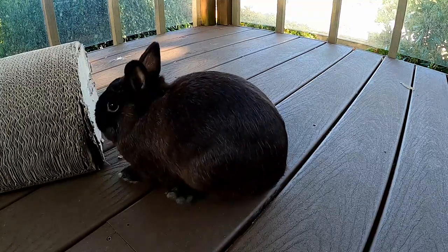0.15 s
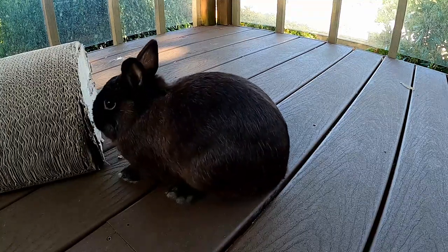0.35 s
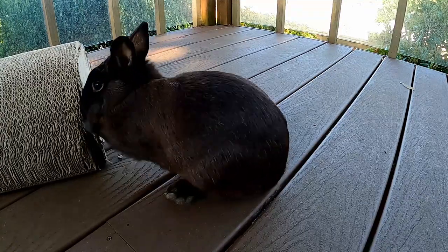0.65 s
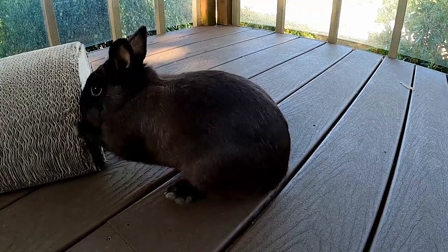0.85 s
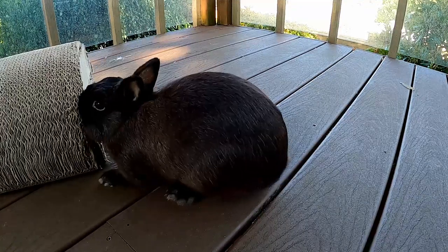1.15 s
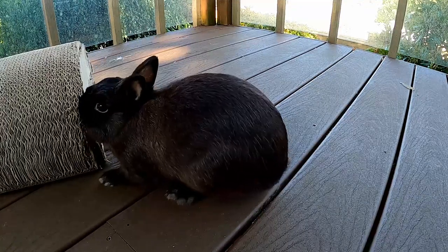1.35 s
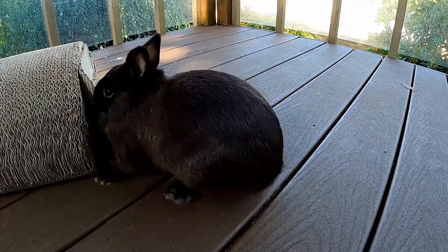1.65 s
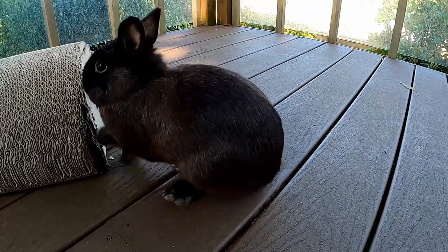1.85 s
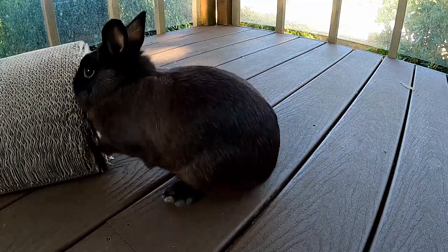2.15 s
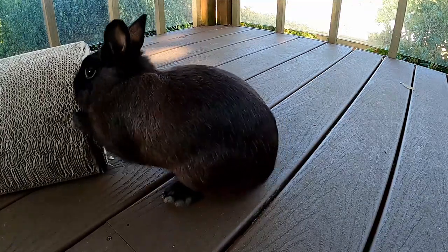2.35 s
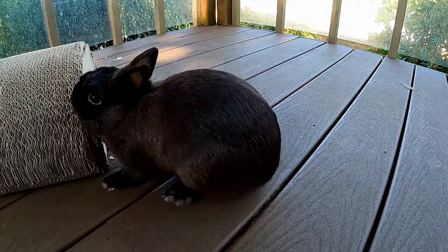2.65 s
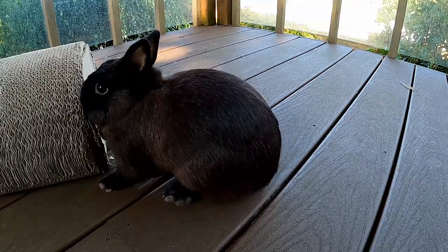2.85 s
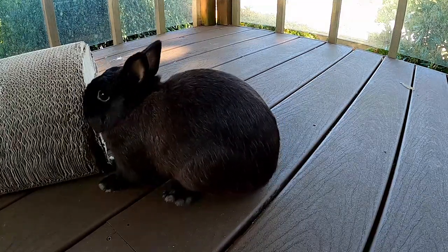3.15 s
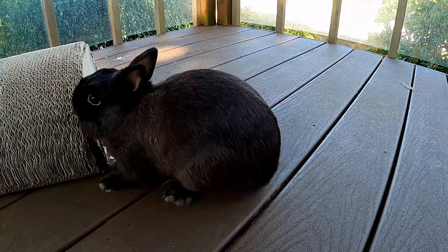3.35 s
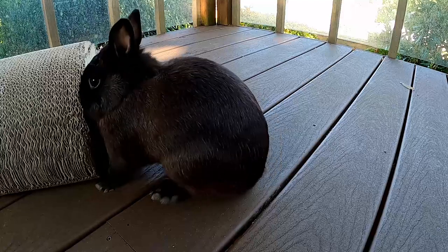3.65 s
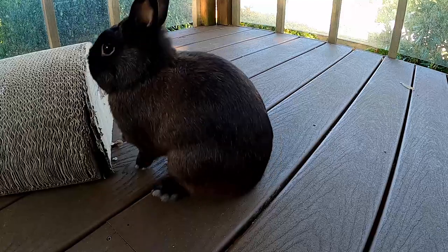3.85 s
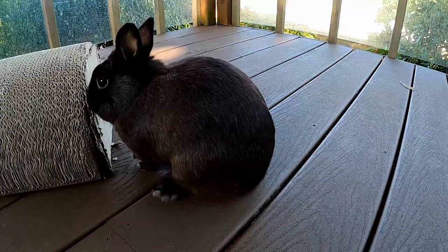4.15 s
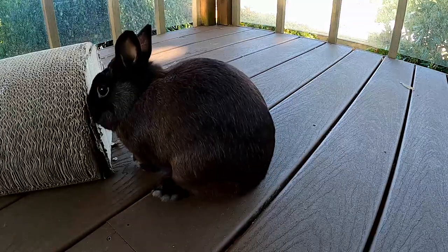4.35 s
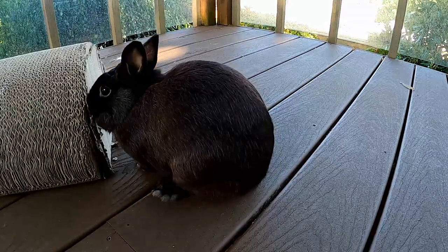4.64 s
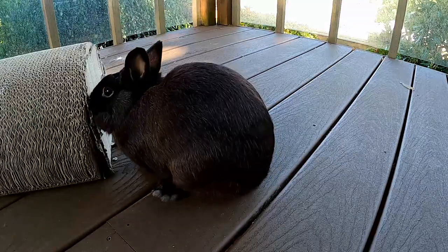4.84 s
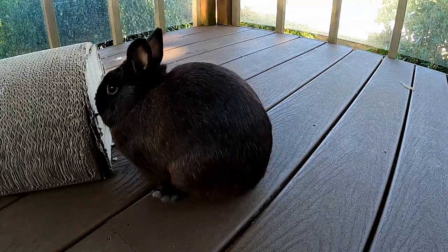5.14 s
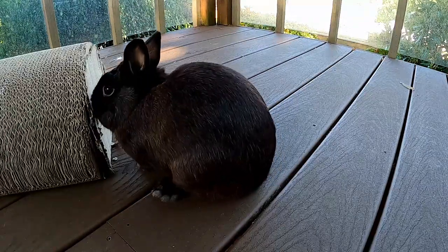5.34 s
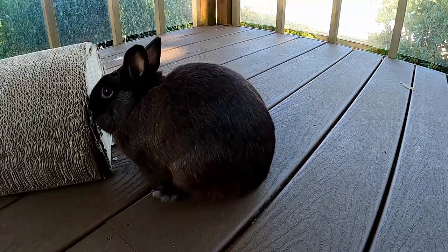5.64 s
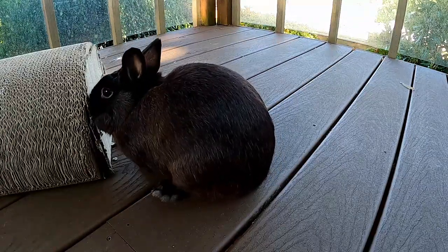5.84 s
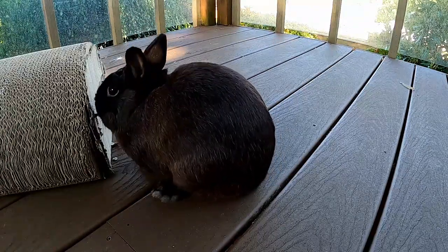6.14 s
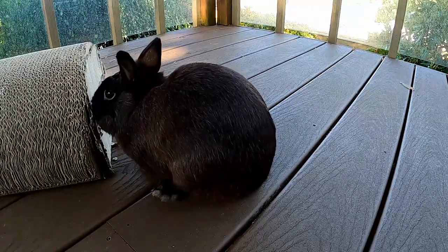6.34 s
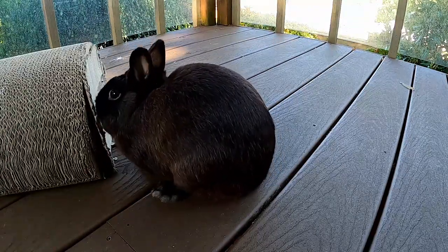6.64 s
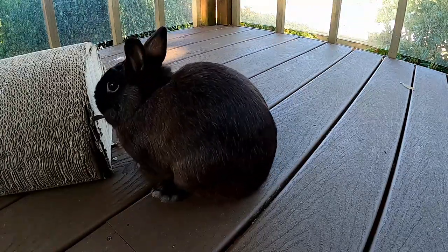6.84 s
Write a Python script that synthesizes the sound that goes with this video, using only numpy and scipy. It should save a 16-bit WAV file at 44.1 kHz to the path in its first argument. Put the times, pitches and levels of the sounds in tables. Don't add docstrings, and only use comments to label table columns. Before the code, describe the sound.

A rabbit claws, tears and bites a corrugated cardboard roll on a wooden deck, in muffled crunchy bursts with thumps, then mostly quiet outdoor hush.

```python
import sys
import numpy as np
from scipy import signal
from scipy.fft import rfft, irfft, next_fast_len
from scipy.io import wavfile
from scipy.ndimage import uniform_filter1d

SR = 44100
rng = np.random.default_rng(int(sys.argv[2]) if len(sys.argv) > 2 else 0)


def volts_from_db(level):
    exponent = np.asarray(level, float) / 20
    return 10 ** exponent


def store_pcm(level_fs):
    pcm = np.round(np.clip(level_fs, -1, 1) * 32767).astype(np.int16)
    wavfile.write(sys.argv[1], SR, np.atleast_2d(pcm).T)


N = 308259
SIZE = next_fast_len(N + SR // 4)
HZ = np.arange(SIZE // 2 + 1) * SR / SIZE + 1e-3
TIME = np.arange(N) / SR


def unit(x):
    return x / np.sqrt(np.mean(np.abs(x) ** 2))


def across(table, column):
    table = np.array(table, float)
    return np.interp(np.log(HZ), np.log(table[:, 0]), table[:, column])


def walk(rate):
    hold = int(SR / rate)
    steps = np.repeat(rng.standard_normal(N // hold + 1), hold)
    return unit(uniform_filter1d(uniform_filter1d(steps, hold), hold)[:N])


def ring(modes):
    rows = []
    for k, (hz, width, db) in enumerate(modes):
        rows.append((-1) ** k * volts_from_db(db) / (1 + 1j * (HZ - hz * hz / HZ) / width))
    return np.array(rows)


def heard(push, body, case, blows=0, roam_db=0, roam_rate=12):
    alike, scatter, direct = case
    whole = body.sum(0)
    norm = np.sqrt(np.mean(np.abs(whole) ** 2 * (np.abs(alike) ** 2 + np.abs(scatter) ** 2)))
    push = push / norm
    struck = whole * direct
    peak = np.abs(irfft(struck.mean(0), SIZE)).max()
    struck = struck * rfft(blows + np.zeros(N), SIZE) / peak
    modes = body if roam_db else whole[None]
    sound = sum(rfft(push * volts_from_db(roam_db * walk(roam_rate)), SIZE) * mode for mode in modes)
    swell = np.sqrt(np.abs(uniform_filter1d(push ** 2, size=40, origin=19)))
    scattered = rfft(swell * rng.standard_normal((2, N)), SIZE) * whole
    return irfft(sound * alike + scattered * scatter + struck, SIZE)[:, :N]


def snaps(rate, spread_db, smooth):
    hit = rng.random(N) < rate / SR
    size = volts_from_db(spread_db * np.minimum(rng.exponential(size=N), 3))
    size = size * np.sign(rng.standard_normal(N))
    return unit(unit(hit * size) + smooth * rng.standard_normal(N))


# top in seconds, top level in dB, half length in seconds, grit in dB, depth in dB.
STROKES = [(.075, -33, 0.031, 3.5, 1), (0.133, -20.5, 0.017, -0.5, 5.5), (0.59, -22.5, 0.023, -1.5, -2),
           (0.654, -29, 0.018, -2, 0), (0.739, -18.5, 0.034, 0, -4.5), (0.839, -18, 0.0308, -5.5, 0.5),
           (0.882, -22.5, 0.031, 2, 1.5), (1.024, -28, 0.034, 1, 6), (1.054, -22, 0.025, -0.5, -2.5),
           (1.572, -39.5, 0.044, -1, -4), (1.78, -26.5, 0.031, 2, 1.5), (2.084, -18, 0.019, 4, -8),
           (2.127, -30, 0.021, 4, -1), (2.179, -28.5, 0.024, -1.5, -5.5), (2.264, -24.5, 0.071, 0, -1.5),
           (2.465, -23.5, 0.036, -1.5, -9), (2.683, -36, 0.049, 3.5, -2), (2.757, -36, 0.033, -5.5, -8),
           (2.91, -35, 0.039, 5.5, 0.5), (3.169, -41.5, 0.021, -12, -4), (3.251, -31.5, 0.025, 1.5, -2.5),
           (3.698, -33.5, 0.055, -2.5, -4.5), (5.187, -37, 0.042, 6, 3), (6.748, -44, 0.041, 12.5, 10.5),
           (0.171, -40.5, 0.054, 5.5, -22), (0.7, -27.5, 0.0073, 12, 10.5), (0.974, -37.5, 0.045, -1, -7.5),
           (1.095, -35, 0.034, 5.5, -3), (1.218, -53.5, 0.207, 4.5, -10), (1.706, -35, 0.024, 4, 7),
           (2.033, -32.5, 0.0101, -5, 0), (2.228, -20, 0.0057, 9.5, 4), (2.402, -31.5, 0.028, -14.5, 0),
           (2.611, -50.5, 0.1, 8, -1), (2.663, -46, 0.033, 13, -12), (2.724, -33.5, 0.02, -20, -3),
           (2.838, -39, 0.0074, -20, -5), (2.886, -35.5, 0.038, 2.5, 4), (3.11, -56, 0.051, 8, 3),
           (3.282, -42, 0.024, -6, -18), (3.463, -55.5, 0.25, 2, -10), (4.14, -57.5, 0.22, -0.5, -3),
           (6.687, -52.5, 0.012, 8.5, -8), (3.74, -40, 0.017, -12, -13), (3.86, -41.5, 0.071, -2, -9),
           (5.149, -44.5, 0.027, -6, 0), (5.173, -37.5, 0.0086, -11, 4), (5.215, -46, 0.028, 5, -7),
           (6.721, -37.5, 0.015, 9, 11.5), (6.828, -44, 0.049, -1.5, -10)]
# start in seconds, peak level in dB, 60 dB decay in seconds, grit in dB.
TEARS = [(0.046, -41, 0.094, -9), (0.115, -30, 0.11, 1), (0.564, -36, 0.065, -17), (0.622, -24, 0.11, 3),
         (0.69, -24.5, 0.113, -12), (0.777, -21.5, 0.11, -3), (0.818, -23, 0.17, 11.5),
         (0.915, -24.5, 0.15, 2), (.985, -44.5, 0.075, 19.5), (1.001, -34.5, .1, 8.5),
         (1.126, -41, 0.202, 6), (1.304, -49, 0.337, 3.5), (1.379, -43, 0.1124, 2), (1.7, -34, 0.43, 5.5),
         (1.768, -27, 0.064, -2), (1.826, -45, 0.05, 5), (1.974, -43.5, 0.17, 6), (2.026, -26, 0.058, -0.5),
         (2.063, -22.5, 0.24, 7.5), (2.213, -21, 0.19, 0), (2.305, -35, 0.1566, 11),
         (2.351, -27, 0.16, -4.5), (2.42, -29.5, 0.23, 2.5), (2.775, -43, 0.056, -6),
         (2.849, -30, 0.044, -3), (3.208, -45.5, 0.054, 15.5), (3.618, -50, 0.14, 8),
         (3.822, -22, 0.083, 0), (6.176, -36.5, 0.17, 4.5), (6.702, -40, 0.147, 4.5),
         (6.777, -27.5, 0.15, -2.5)]
# start in seconds, crackle peak in dB,
# wall above it in dB, boom above it in dB.
SNAPS = [(0.5644, -44, 9.5, 7), (0.5849, -31.5, 9, 0), (0.6214, -31.5, -6, -3), (0.701, -25, -6.5, -11.5),
         (0.7059, -34.5, 7.5, 11.5), (0.8194, -24.5, -1, -14), (0.8326, -19.5, 0, -9.5),
         (0.8408, -29.5, 11, -4), (0.874, -36, 12, 8), (0.8863, -34.5, 6, -5), (1.009, -29.5, -14, -3.5),
         (1.0554, -32.5, 9, -1.5), (2.0709, -21, -5, -10), (2.164, -42, -1, -3), (2.312, -36.5, -5.5, -6.5),
         (2.3364, -38.5, -6, 4), (2.4272, -36, -2, 8.5), (2.451, -43.5, 18, 9), (2.463, -32, 5, 0),
         (5.165, -49.5, 8.5, 3), (5.1843, -46.5, -4, -19), (0.7275, -37, 14, 0.5), (0.774, -30.5, 0, 0),
         (0.9177, -34.5, 8.5, 6), (0.9842, -39, -7.5, -14.5), (1.0183, -29, -10, 1),
         (1.127, -34.5, -3.5, -30.5), (1.376, -51, 7, -8.5), (1.6988, -13, -37.5, -26),
         (1.7818, -38.5, 11.5, 4), (1.9748, -52, 5, -6), (2.023, -35.5, -4, -11.5),
         (2.0624, -28.5, 1.5, -1.5), (2.0933, -23.5, 7, -6.5), (2.175, -32.5, 1.5, -5.5),
         (2.2108, -22, -3.5, -7), (2.223, -22, -3, -1.5), (2.3038, -25.5, 0.5, -11.5),
         (2.353, -28.5, 1.5, -1.5), (2.3676, -32.5, 4.5, -6), (2.853, -31.5, 7, 4), (2.9117, -36.5, -8, -2),
         (3.091, -46.5, -18, -14), (3.21, -47.5, -5, -1.5), (3.244, -44.5, 15, -9), (3.8208, -34.5, 9, -1),
         (5.2017, -44.5, -15, 3.5), (6.1775, -45, 0, 6), (6.781, -33, 1.5, 6.5),
         (0.5497, -49, 0, 10.5), (0.5777, -34, 3.5, -13), (0.6293, -31, 0.5, -2.5), (0.6926, -28, -5, -6.5),
         (.7334, -25.5, 5, -9), (0.7529, -32, -6, -4.5), (0.7815, -31.5, -3, 6), (0.8595, -31.5, 1.5, -6.5),
         (0.8964, -30, 1.5, -4), (0.9227, -35.5, 1.5, -2), (1.0039, -32.5, -6, -6.5),
         (1.0951, -39.5, 1.5, -7), (1.9835, -48.5, 0.5, -5.5), (2.034, -33.5, -5.5, -7),
         (2.0767, -24, 3, -4.5), (2.0823, -27.5, -5, -12.5), (2.113, -31.5, 4.5, 0),
         (2.131, -34.5, -2.5, -8), (2.2362, -29.5, 6.5, -5.5), (2.2645, -31, 3.5, 0),
         (2.4204, -38.5, 0.5, 4), (2.475, -32.5, 4, -5), (2.5883, -55.5, -11, -10), (2.595, -47, -12, -14),
         (2.6175, -51.5, -11, -10), (2.6378, -44.5, -5, -14), (2.6517, -42.5, -2, -25), (2.68, -40, 9, 2),
         (2.745, -48, -2, -11), (2.8337, -51, 7, -1)]
RAKE_RISE_DB, RAKE_FALL_DB = 15.5, 13
RAKE_TAIL_DB, RAKE_TAIL_T60_S = -21.5, 0.18
TEAR_DEPTH_PER_GRIT = -0.59
SPLINTER_S, SPLINTER_SIZE = 0.0015, 0.37


def effort(grit, depth, snap_column, rake_db, tear_db, snap_db, build_s, tail_db=0):
    power, blows = np.zeros(N), np.zeros(N)
    for top, db, half, grit_db, depth_db in STROKES:
        span = slice(max(int((top - .2) * SR), 0), int((top + .4) * SR))
        t = TIME[span] - top
        db = db + grit * grit_db + depth * depth_db + rake_db
        stroke = np.where(t < 0, RAKE_RISE_DB, RAKE_FALL_DB) * np.abs(t / half) ** 0.83
        tail = (t > 0) * volts_from_db(db + RAKE_TAIL_DB + tail_db - 60 * t / RAKE_TAIL_T60_S) ** 2
        power[span] += volts_from_db(db - stroke) ** 2 + tail
    for s, db, t60, grit_db in TEARS:
        start = int(s * SR)
        t = TIME[:min(SR // 5, N - start)]
        db = db + (grit + depth * TEAR_DEPTH_PER_GRIT) * grit_db + tear_db
        decay = volts_from_db(db - 60 * t / np.clip(t60, .02, .4))
        power[start:start + len(t)] += (decay * (1 - np.exp(-t / build_s))) ** 2
    breaks = SNAPS
    splinter = SPLINTER_SIZE * rng.standard_normal((len(breaks), 256)) * np.exp(-TIME[:256] / SPLINTER_S)
    splinter[:, 0] = 1
    for row, shape in zip(breaks, splinter):
        start = int(row[0] * SR)
        above_db = row[snap_column] if snap_column > 1 else 0
        blows[start:start + len(shape)] += shape * volts_from_db(row[1] + above_db + snap_db)
    return np.sqrt(power), blows


# pitch in Hz, width in Hz, level in dB.
ROLL_WALL = [(877, 83, 0), (1002, 239, 2.5), (1070, 161, 5), (1230, 41.6, -1), (1261.6, 32, 3),
             (1643, 350, -6.5)]
# pitch in Hz, width in Hz, level in dB.
ROLL_BOOM = [(420.4, 152, -3), (454.6, 85.5, 2), (533, 85, 1.5), (675, 238, -6), (756.3, 41.3, -0.5)]
# pitch in Hz, width in Hz, level in dB.
FLUTES = [(1940, 380, 2.5), (3260, 20, 10), (3180, 840, 2.5), (4197, 95, 3.5), (4785, 230, -0.5),
          (5170, 260, 9.5), (7420, 1300, 8.5)]
RUSTLE_FOLLOWS = 0.77
RUSTLE_REST_DB = -100


def cardboard(case):
    flicker = walk(70)
    coarse = snaps(rate=1500, spread_db=0.5, smooth=0.81) * volts_from_db(2.2 * flicker)
    crisp = snaps(rate=1100, spread_db=4.0, smooth=0.65) * volts_from_db(2.15 * flicker + 1.4 * walk(150))
    edge_tone = (1 / (1 - 1j * 1900 / HZ)) ** 3 / (1 + 1j * HZ / 5500) ** 2
    edge = edge_tone * np.vstack([np.ones(len(HZ)), ring(FLUTES)])
    fine = (1 / (1 - 1j * 8000 / HZ)) ** 6 / (1 + (HZ / 13200) ** 12)
    wall = effort(0, 0, snap_column=2, rake_db=-4.0, tear_db=-3.0, snap_db=-3.5, build_s=0.001)
    torn = effort(0.95, 0, snap_column=1, rake_db=-13.0, tear_db=-12.0, snap_db=-1.0, build_s=0.003,
                  tail_db=5.5)
    boom = effort(0, 0.88, snap_column=3, rake_db=-8.5, tear_db=-11.0, snap_db=-0.5, build_s=0.01)
    stir, flicks = effort(1.9, 0, snap_column=1, rake_db=-55.5, tear_db=-59.0, snap_db=-32.0, build_s=0.0019,
                          tail_db=-11.0)
    rustle = np.maximum(stir - volts_from_db(RUSTLE_REST_DB), 0) ** RUSTLE_FOLLOWS, flicks
    parts = [(wall, coarse, ring(ROLL_WALL), 1.2),
             (torn, crisp, edge, 3.5),
             (boom, coarse, ring(ROLL_BOOM), 1.2),
             (rustle, crisp, fine[None], 2.5)]
    return sum(heard(grain * force, body, case, blows, roam_db)
               for (force, blows), grain, body, roam_db in parts)


# start in seconds, peak level in dB.
CRACKS = [(.045, -52), (.075, -47), (.116, -45), (.5785, -46), (.6235, -42), (.6925, -40), (.7015, -35),
          (.82, -38), (.8325, -39), (.9865, -44), (1.0105, -40), (1.6992, -27), (1.7695, -46),
          (2.0635, -32), (2.0712, -32), (2.2125, -40), (2.225, -35), (2.353, -43), (2.368, -48),
          (2.4635, -43.5), (2.6525, -45), (2.852, -42.5), (3.822, -41.5), (6.178, -44)]
# pitch in Hz, width in Hz, level in dB.
CRACK_MODES = [(4730, 780, -1), (6360, 2100, 7)]
CRACK_S = 0.0016


def cracks(case):
    blows = np.zeros(N)
    bursts = rng.standard_normal((len(CRACKS), 256)) * np.exp(-TIME[:256] / CRACK_S)
    for (s, db), burst in zip(CRACKS, bursts):
        start = int(s * SR)
        blows[start:start + 256] += volts_from_db(db) * burst / np.sqrt(np.sum(burst ** 2)) * 2
    body = ring(CRACK_MODES) / (1 + 1j * HZ / 7000) ** 3
    return heard(np.zeros(N), body, case, blows)


# top in seconds, top level in dB, half length in seconds.
RASPS = [(.12, -48, 0.031), (1.066, -46, 0.017), (2.595, -59, 0.022), (2.662, -48.5, .03),
         (2.87, -56, 0.022), (5.2, -56, 0.018), (6.75, -56.5, 0.03)]
# pitch in Hz, width in Hz, level in dB.
RASP_MODES = [(4580, 210, -0.5), (5250, 270, -0.5)]


def rasp(case):
    force = sum(volts_from_db(db - 13 * ((TIME - top) / half) ** 2) for top, db, half in RASPS)
    ticks = snaps(rate=3100, spread_db=6.0, smooth=.6)
    return heard(force * ticks, ring(RASP_MODES), case, roam_db=2.0, roam_rate=40)


# pitch in Hz, width in Hz, half the level in dB.
SLIDE = [(560, 94, -7), (700, 55, -3.5), (998, 148, -4.5), (1028, 57.8, -4), (1210, 33, -1.5),
         (1321, 73, -2.5), (1593, 150, -7), (1750, 260, -6), (3100, 660, -0.5), (4160, 270, 0),
         (5060, 810, -2.5)]
SKID_S, SKID_LENGTH_S, SKID_EDGE_S, SKID_STOP_S = 0.317, 0.24, 0.0023, 0.071
SKID_DB, SKID_SAG_DB_PER_S = -36.5, 20
SKID_TREBLE_DB, SKID_TREBLE_SAG_DB_PER_S = -16.5, 37


def skid(case):
    t = TIME - SKID_S
    contact = np.clip(np.minimum(t / SKID_EDGE_S, (SKID_LENGTH_S - t) / SKID_STOP_S), 0, 1)
    contact = contact * volts_from_db(SKID_DB - SKID_SAG_DB_PER_S * (t - 0.1085) - 2.5)
    friction = contact * rng.standard_normal(N)
    treble = friction * volts_from_db(SKID_TREBLE_DB - SKID_TREBLE_SAG_DB_PER_S * np.clip(t, 0, 1))
    body = ring(SLIDE) ** 2
    high = np.array(SLIDE)[:, 0] > 2500
    low_groan = heard(friction, body[~high], case, roam_db=2.2, roam_rate=19.6)
    return low_groan + heard(treble, body[high], case, roam_db=2.5, roam_rate=24)


# start in seconds, peak level in dB, pitch in Hz.
TAPS = [(.116, -21.5, 600), (.134, -15.5, 560), (.564, -27, 900), (0.624, -29, 300), (.6242, -19, 750),
        (.729, -19, 778), (0.774, -18, 370), (.7757, -18, 850), (.9175, -18, 428), (.918, -17, 900),
        (1.694, -31, 430), (1.714, -28.5, 330), (1.78, -21, 256), (2.2125, -19, 900), (2.212, -26, 432),
        (2.306, -18, 347), (2.351, -29, 452), (2.423, -29, 700), (2.4528, -15.5, 800), (2.852, -22.5, 700),
        (2.911, -27.5, 444), (3.688, -26.5, 490), (3.722, -33.5, 318), (3.79, -31, 190), (3.822, -15, 280),
        (5.201, -25, 264), (6.727, -29.5, 402), (6.78, -26, 480), (6.786, -16.5, 496)]
TAP_DB_PER_CYCLE = 11


def taps():
    out = np.zeros(N)
    t = TIME[:SR // 10]
    for s, db, hz in TAPS:
        start = int(s * SR)
        out[start:start + len(t)] += volts_from_db(db - TAP_DB_PER_CYCLE * hz * t) * np.sin(2 * np.pi * hz * t)
    return out * volts_from_db(np.array([[1.2], [-1.2]]))


# start in seconds, peak level in dB, pitch in Hz, 60 dB decay in seconds.
THUMPS = [(0.123, -27, 71, 0.16), (0.618, -31, 61, 0.22), (0.706, -29, 83, 0.21),
          (0.761, -27.5, 50.3, 0.57), (0.837, -26.5, 62.2, 0.67), (1.67, -40, 67, 0.37),
          (1.776, -25, 58, 0.31), (1.824, -32, 61, 0.43), (1.896, -36.5, 44, 0.75),
          (2.085, -28.5, 67, 0.18), (2.301, -33.5, 68.4, 0.29), (2.874, -35.5, 248, 0.14),
          (2.912, -30.5, 262, 0.073), (3.24, -35, 93.8, 0.3), (3.28, -36, 55, .5), (3.718, -33, 57.2, 0.77),
          (3.799, -29.5, 57.6, 0.44), (3.839, -21, 58.4, 0.27), (3.845, -32, 160, .15),
          (3.873, -30.5, 59, 0.3), (5.189, -31.5, 96, 0.16), (5.209, -32, 56.7, 0.24), (5.53, -42, 60, .5),
          (6.174, -34, 69, 0.37), (6.792, -29, 59.2, 0.19)]
# pitch in Hz, width in Hz, level in dB.
JOISTS = [(33, 25, -13), (54.14, 19, -2.5), (80.3, 30, -3), (154.9, 28.4, -10.5)]
# pitch in Hz, width in Hz, level in dB.
PLANK = [(193, 51, 3), (280, 110, -1)]
REST_JOIST_DB, REST_PLANK_DB = -56.5, -60.5
WORK_JOIST_DB, WORK_PLANK_DB, WORK_LAG_S = -9.5, -14, 0.012
LAND_JOIST_DB, LAND_PLANK_DB, PLANK_T60_SHARE = -12, -11.5, 0.42
PLANK_DB_PER_OCTAVE = 6.5
BOOM_RISE_CYCLES = 0.085


def deck(case):
    keep = np.exp(-1 / (WORK_LAG_S * SR))
    force, _ = effort(0, 0.82, snap_column=1, rake_db=-4.5, tear_db=-1.0, snap_db=0, build_s=0.009)
    work = signal.lfilter([1 - keep], [1, -keep], force ** 2)
    sway = walk(2.5)
    joist = volts_from_db(REST_JOIST_DB + 5.3 * sway) ** 2 + volts_from_db(WORK_JOIST_DB) ** 2 * work
    plank = volts_from_db(REST_PLANK_DB + 1.2 * sway + 2.0 * walk(7)) ** 2 + volts_from_db(WORK_PLANK_DB) ** 2 * work
    shake = rng.standard_normal(N)
    knock = np.zeros(N)
    for s, db, hz, t60 in THUMPS:
        span = slice(int(s * SR), int(s * SR) + SR)
        t = TIME[:len(knock[span])]
        rise = 1 - np.exp(-t * hz / BOOM_RISE_CYCLES)
        fall_db = 60 * t / max(t60, .05)
        knock[span] += volts_from_db(db - fall_db) * rise * np.sin(2 * np.pi * hz * t)
        joist[span] += (volts_from_db(db + LAND_JOIST_DB - 0.49 * fall_db) * rise) ** 2
        plank_db = db + LAND_PLANK_DB + PLANK_DB_PER_OCTAVE * np.log2(hz / 60)
        plank[span] += (volts_from_db(plank_db - fall_db / PLANK_T60_SHARE) * rise) ** 2
    rumble = heard(shake * np.sqrt(joist), ring(JOISTS), case)
    rumble = rumble + heard(shake * np.sqrt(plank), ring(PLANK), case)
    return rumble + knock * volts_from_db(np.array([[.5], [-.5]]))


# frequency in Hz, level in dB per Hz.
AIR = [(25, 6), (60, -2), (150, 8), (250, -9), (380, -5.5), (480, -15), (650, -17), (930, -17.5),
       (1180, -10.5), (2000, -16), (4300, -17), (5300, -15.5), (6300, -16), (9000, -13), (15000, -25.5)]
# multiple of the hum pitch, rms level in dB.
HUM = [(1, -61.5), (2, -64), (5, -64.5), (6, -73)]
HUM_HZ, HUM_BREAK_DB = 59.2, 5.5
AIR_DB, AIR_SWELL_DB = -53.5, 0.8


def air(case):
    breath = rng.standard_normal(N) * volts_from_db(AIR_SWELL_DB * walk(0.64))
    hush = heard(breath, volts_from_db(across(AIR, 1))[None], case)
    turn = 2 * np.pi * np.cumsum(HUM_HZ * (1 + 0.003334 * walk(6))) / SR
    hum = sum(volts_from_db(db + HUM_BREAK_DB * walk(9) - 2) * np.sqrt(2) * np.sin(k * turn) for k, db in HUM)
    return volts_from_db(AIR_DB) * hush + hum


def causal(db):
    fold = irfft(db * np.log(10) / 20, SIZE)
    fold[1:SIZE // 2] *= 2
    fold[SIZE // 2 + 1:] = 0
    return np.exp(rfft(fold))


# frequency in Hz, gain in dB, left minus right in dB, left lead in radians, likeness from 0 to 1.
CASE = [(800, -12, 3.6, 0.2, 0.85), (1100, 0, 2.4, 0.2, 0.98), (1500, -15, 0.2, 0.1, 0.75),
        (1950, -18, -0.3, -0.5, 0.75), (2300, -24, 4.4, -1.4, 0.69), (2800, -23, 6.3, -1.3, 0.65),
        (3300, -16, 8.6, -0.7, 0.84), (3900, -20, 6.6, 0.2, 0.6), (4700, -20, -1.3, 1.0, 0.81),
        (5400, -20, -8.8, 2.7, 0.63), (6500, -33, -3.8, 3.6, 0.42), (8500, -46, 3.2, 4.3, 0.33),
        (12000, -48, 1.2, 4.4, 0.26), (15300, -56, -1.5, 4.4, 0.09)]


def ports(scatter):
    side = np.array([[.5], [-.5]])
    balance = volts_from_db(side * across(CASE, 2) * HZ / (HZ + 300))
    lead = np.exp(1j * side * across(CASE, 3) * HZ / (HZ + 200))
    direct = causal(across(CASE, 1)) * balance * lead
    alike = np.clip(across(CASE, 4), 0, 1) ** (scatter * HZ / (HZ + 2500))
    return direct * np.sqrt(alike), direct * np.sqrt(1 - alike), direct


def scene():
    case = ports(scatter=3.0)
    roll = cardboard(case) + cracks(case) + rasp(case) + skid(case)
    boards = taps() + deck(case)
    return roll + boards + air(ports(scatter=6.3))


def band_limit(x):
    return signal.sosfilt(signal.butter(12, 15500, fs=SR, output="sos"), x)


def record(dry):
    hiss = np.diff(rng.standard_normal((2, N + 1)))
    return band_limit(dry + volts_from_db(-103) * hiss)


dry = scene()
out = record(dry)
store_pcm(out)
```